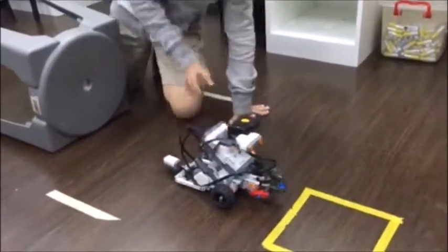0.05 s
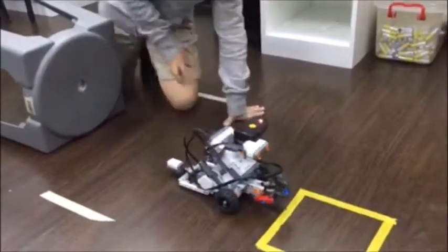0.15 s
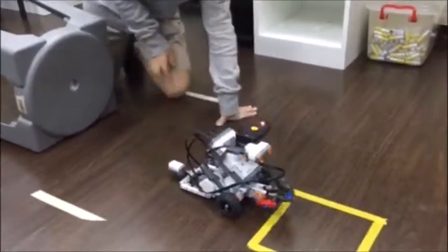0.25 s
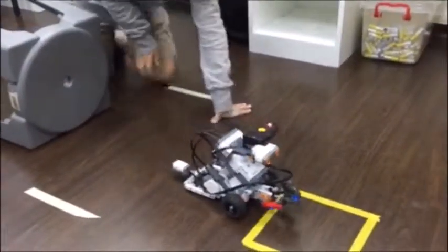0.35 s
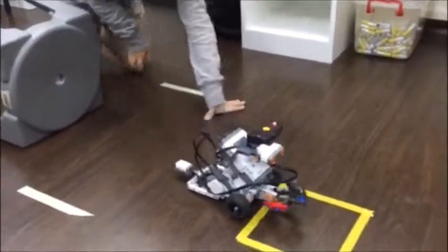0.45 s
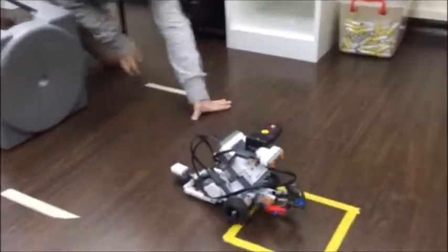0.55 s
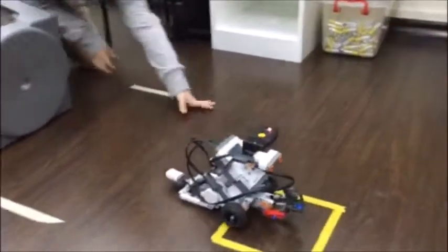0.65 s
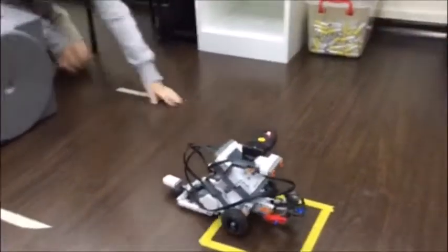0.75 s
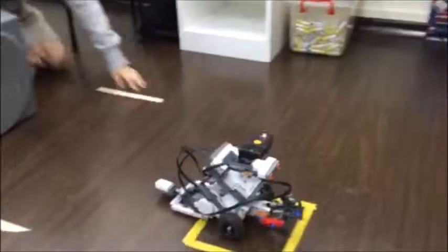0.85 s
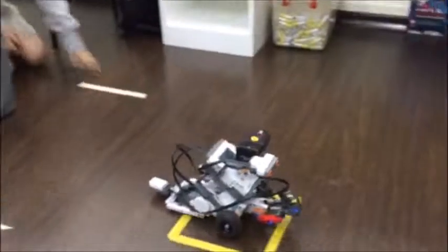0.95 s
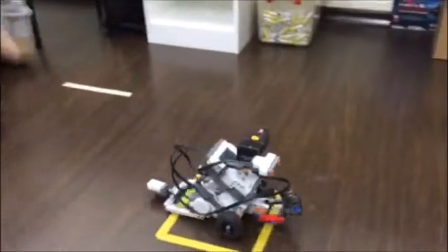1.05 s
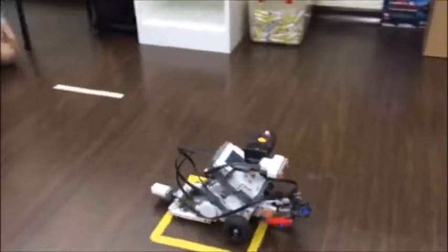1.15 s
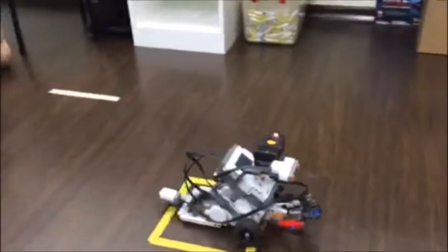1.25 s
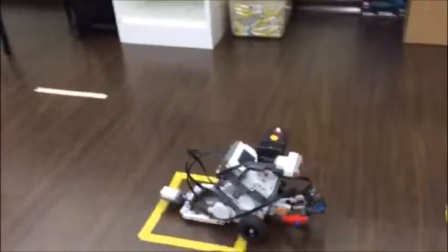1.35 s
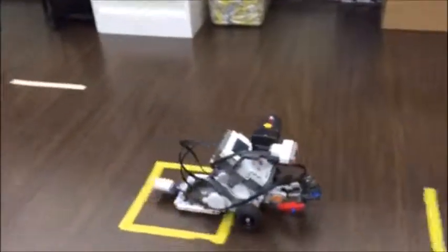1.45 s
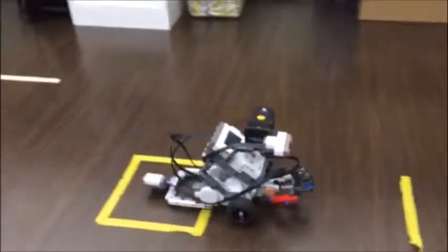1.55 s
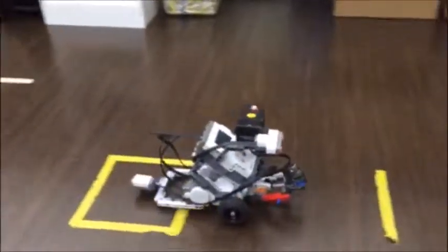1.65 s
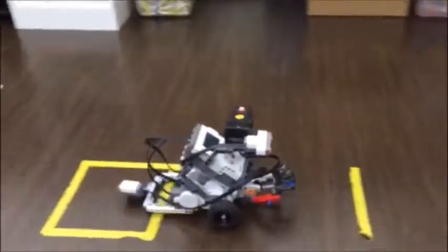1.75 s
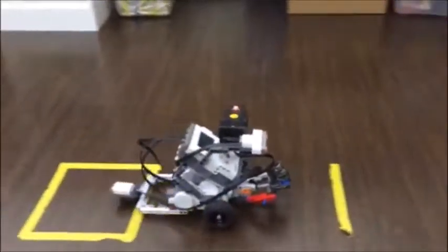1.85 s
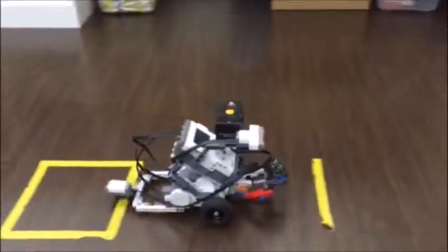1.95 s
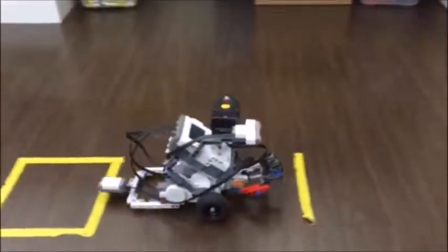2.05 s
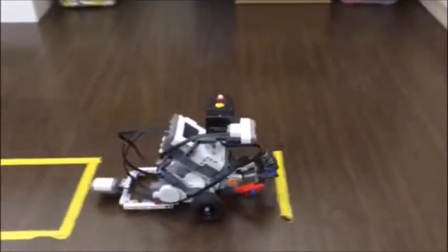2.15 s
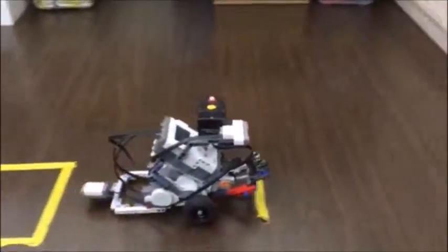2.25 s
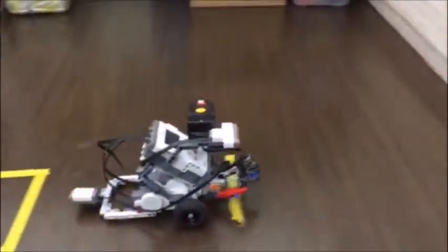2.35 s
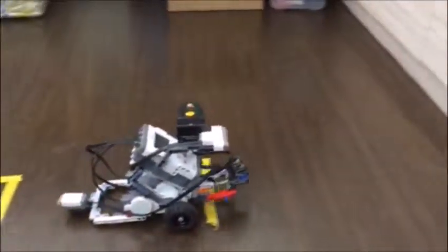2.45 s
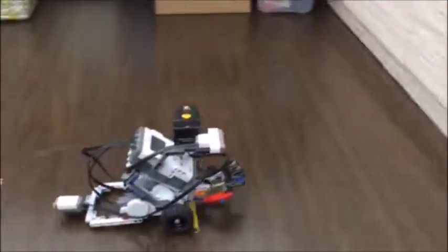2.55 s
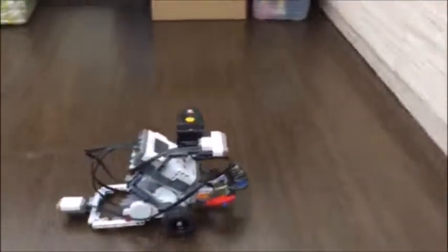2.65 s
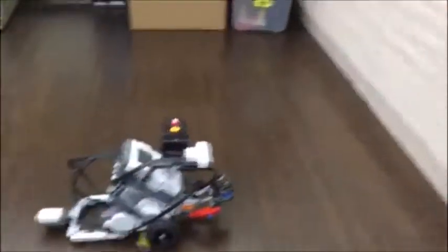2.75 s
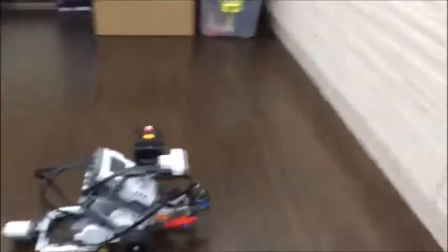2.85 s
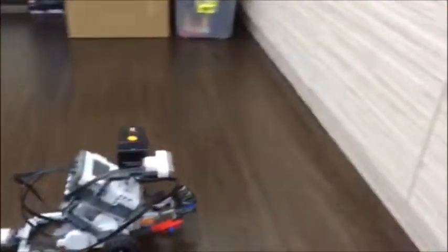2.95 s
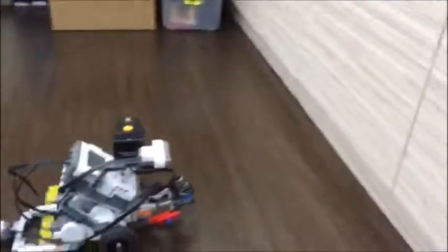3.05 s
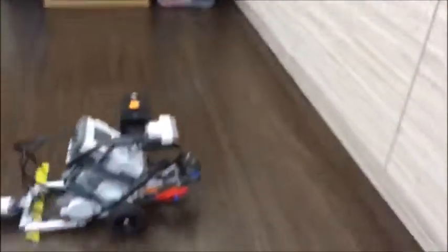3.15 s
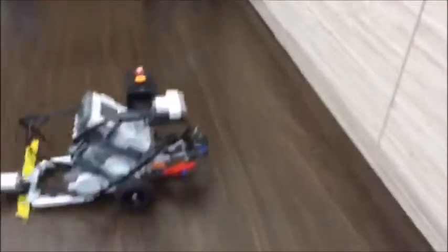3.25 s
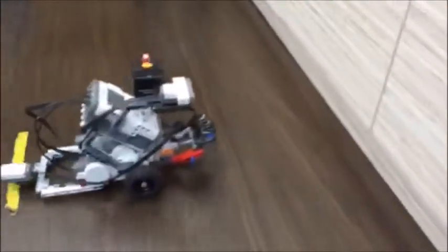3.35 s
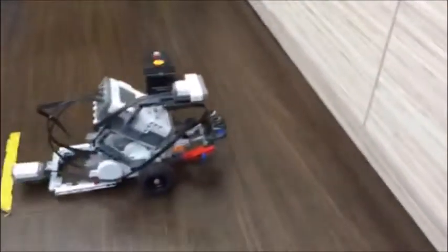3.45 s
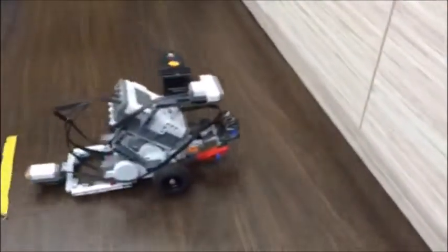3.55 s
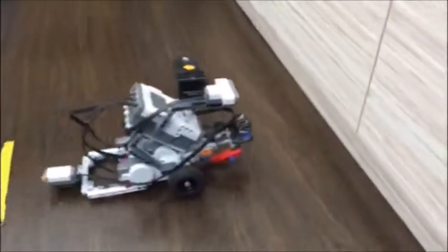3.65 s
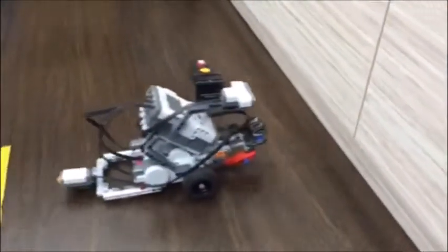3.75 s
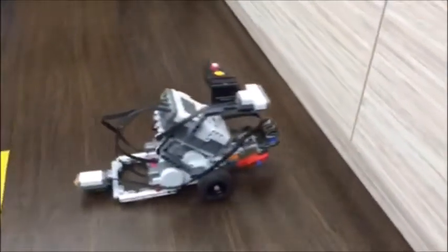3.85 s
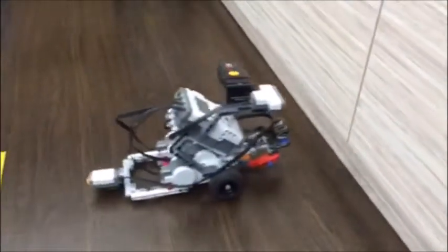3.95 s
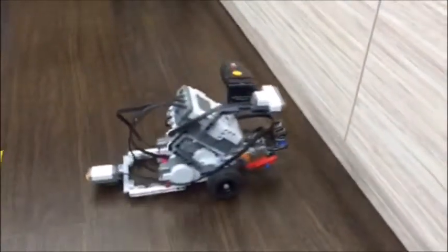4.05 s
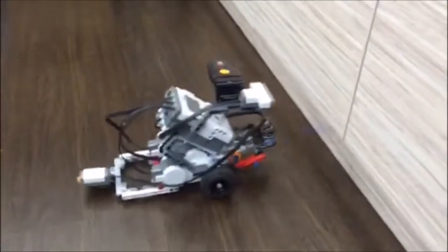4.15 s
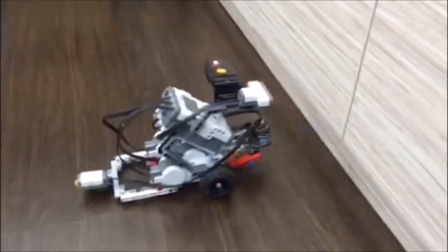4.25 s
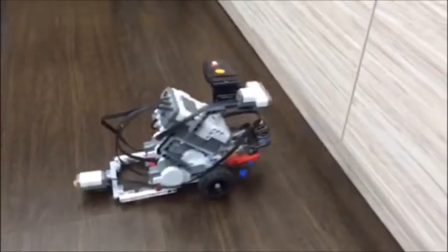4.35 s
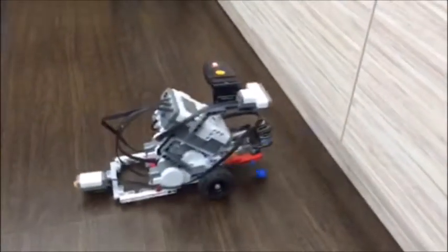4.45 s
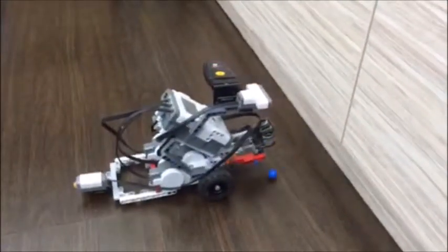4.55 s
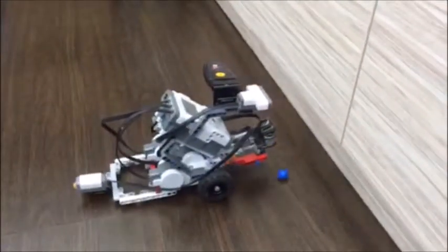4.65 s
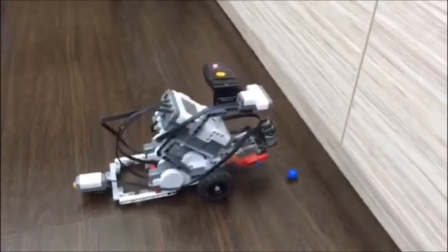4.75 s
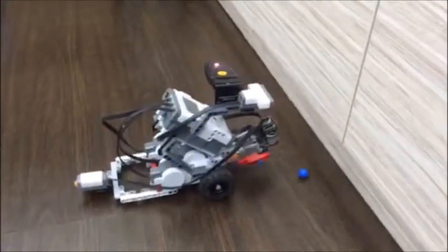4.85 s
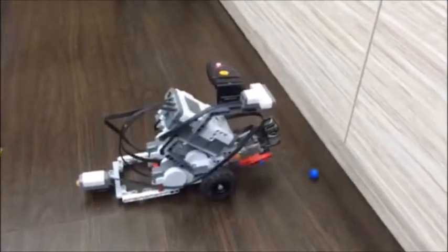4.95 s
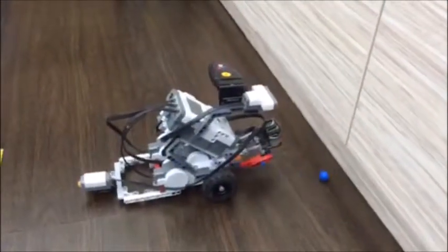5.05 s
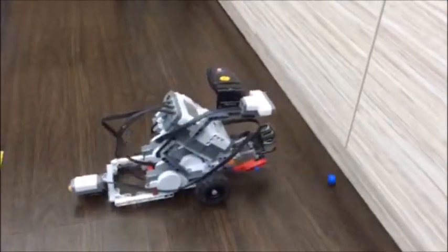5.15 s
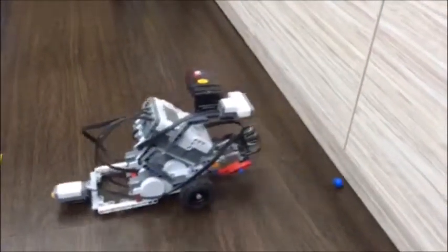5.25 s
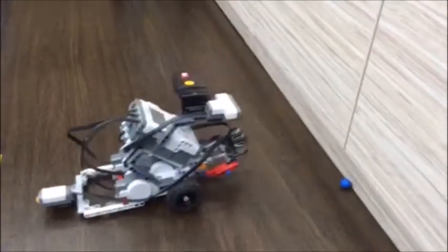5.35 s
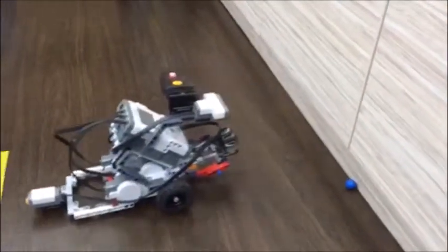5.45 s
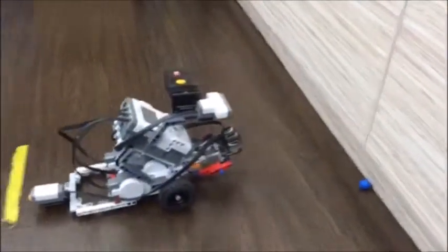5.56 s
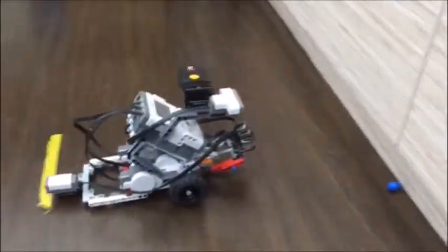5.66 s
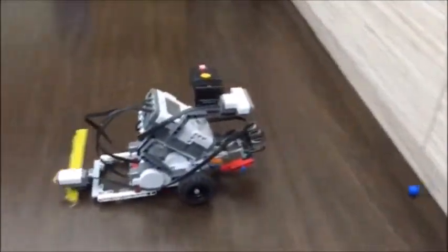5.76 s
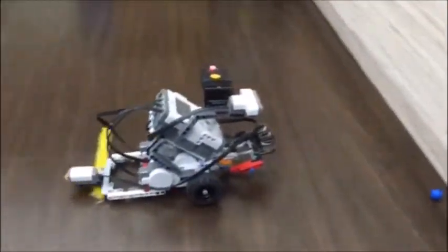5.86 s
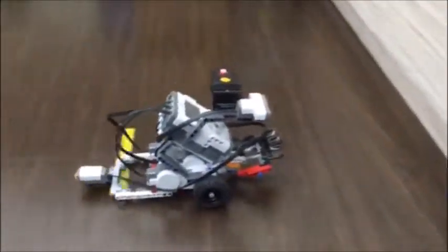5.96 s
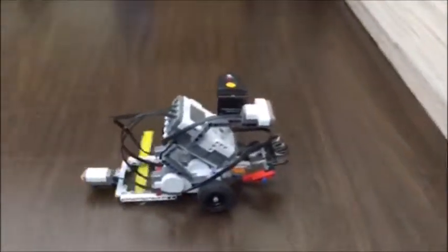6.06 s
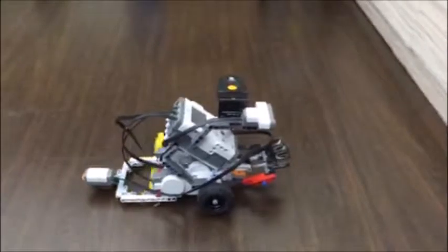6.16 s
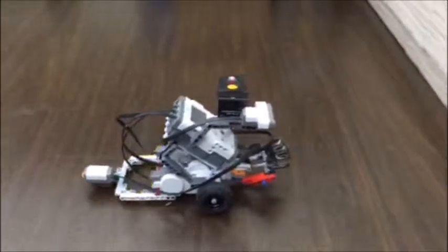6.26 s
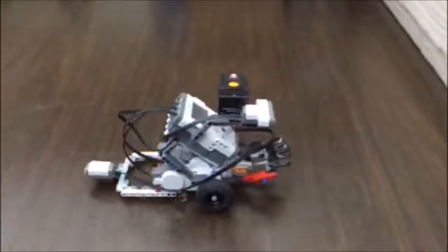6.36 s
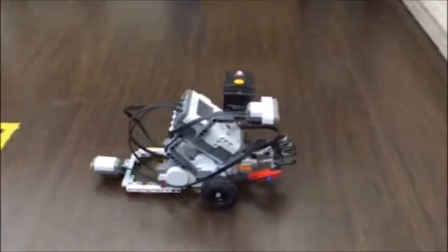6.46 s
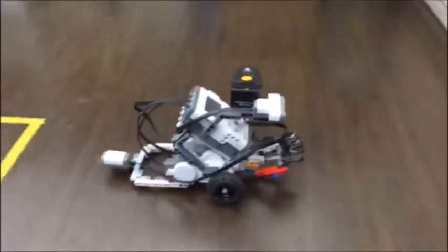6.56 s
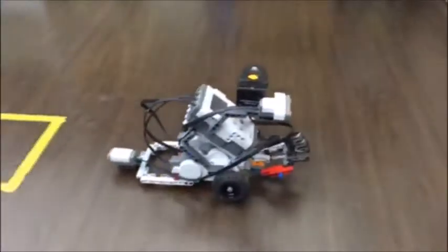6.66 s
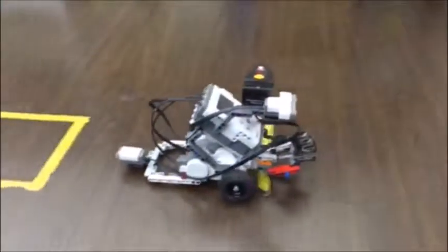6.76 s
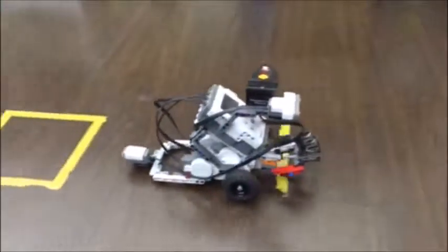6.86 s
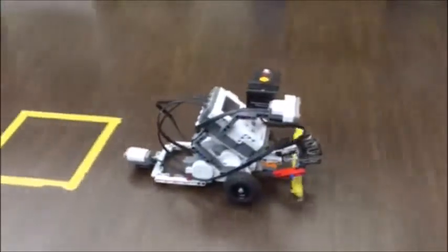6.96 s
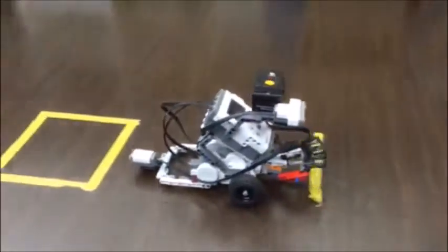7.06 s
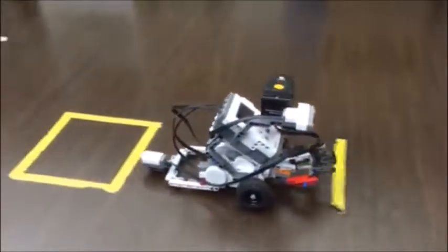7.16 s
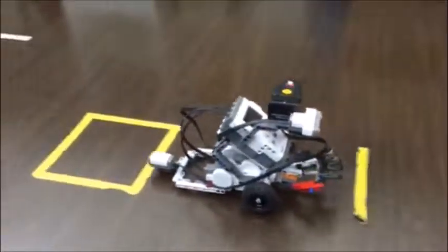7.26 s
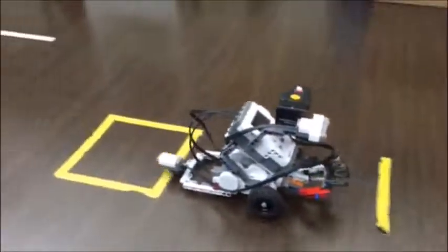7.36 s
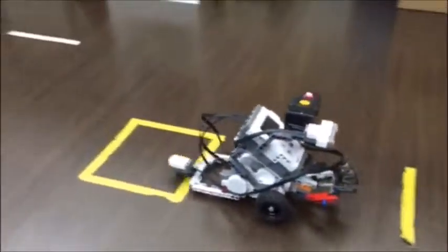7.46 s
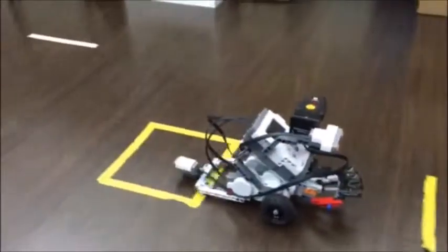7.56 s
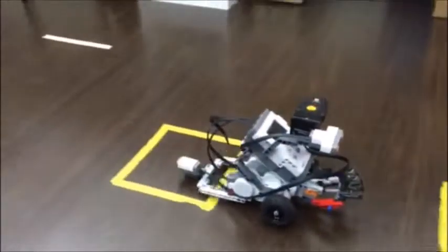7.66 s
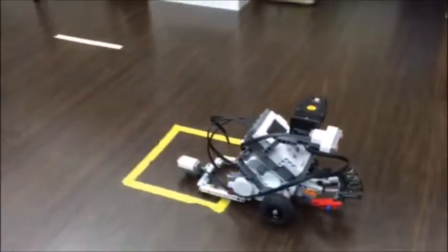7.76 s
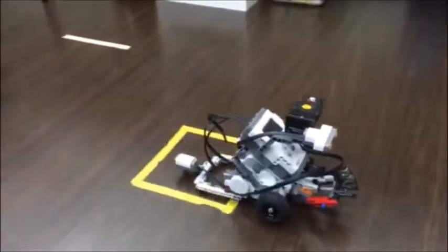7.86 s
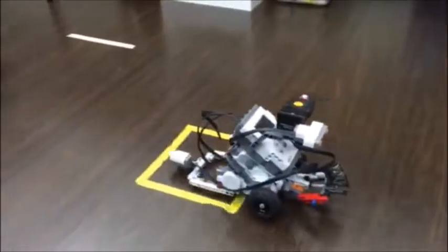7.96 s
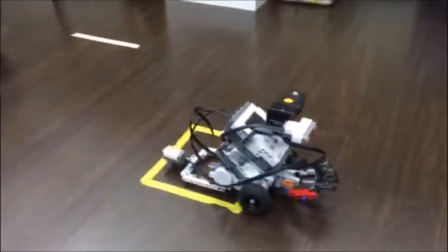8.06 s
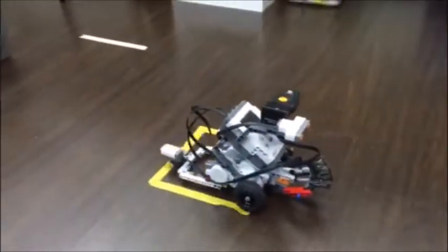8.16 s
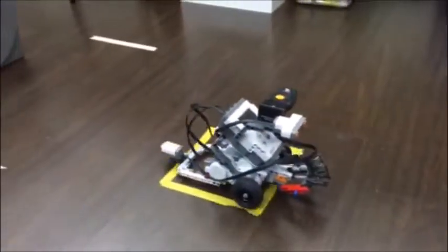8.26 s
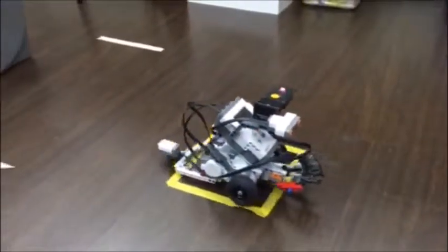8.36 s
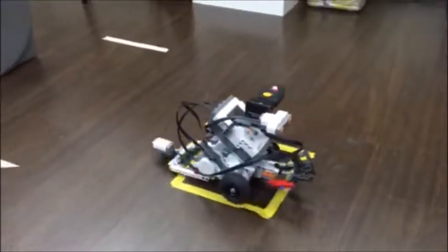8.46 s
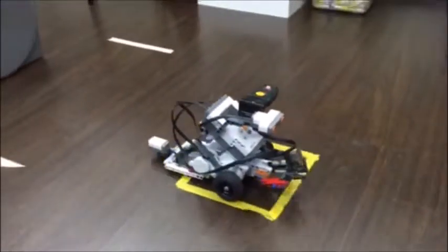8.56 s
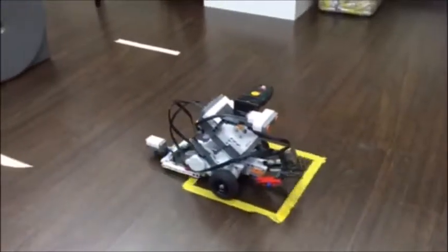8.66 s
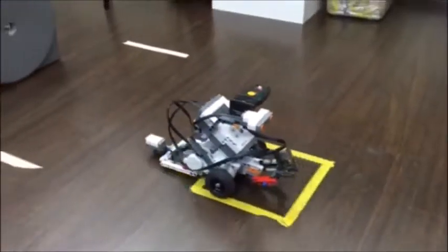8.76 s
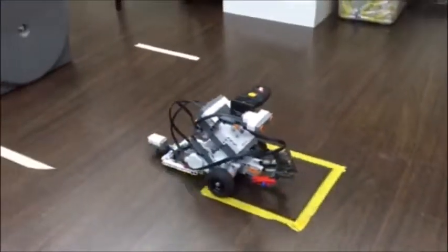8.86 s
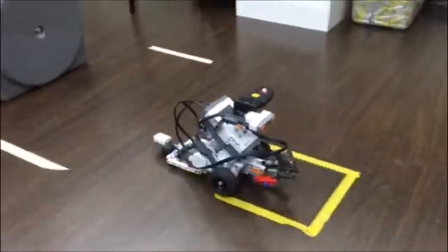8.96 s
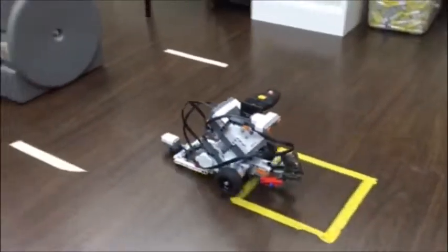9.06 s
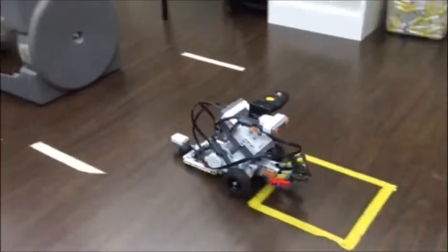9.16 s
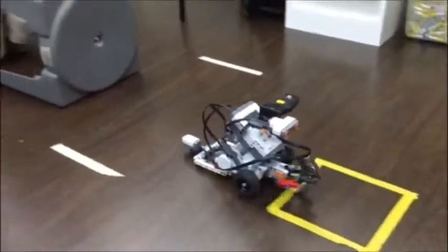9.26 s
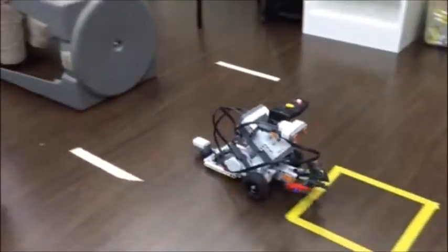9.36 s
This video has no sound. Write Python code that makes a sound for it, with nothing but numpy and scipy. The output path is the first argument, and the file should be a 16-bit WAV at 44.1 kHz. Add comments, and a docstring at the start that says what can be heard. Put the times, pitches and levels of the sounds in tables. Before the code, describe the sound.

In a hard, echoing room with low ventilation rumble, a toy robot's geared motors rattle and whine forward, pulsing slightly. Faint cloth shuffling, a knock and a short squeak come from the floor. After four seconds the motor drops to a lower whirr, a launcher snaps so loudly the microphone overloads, plastic bounces, a ball rolls off, and the robot reverses with a wavering whine.

```python
"""A hard room with a wooden floor and a low ventilation hum, heard through one microphone.
A toy robot drives over the boards, winds its launcher, snaps a ball out and backs away.
Its geared motors are sine tones and thousands of tiny hits, both following one turning shaft.
Clicks and knocks are dying bursts of noise; the rolling ball and a person shuffling are coloured noise.
The snap is so loud that the microphone overloads."""
import sys
import numpy as np
from scipy import signal
from scipy.io import wavfile
from scipy.ndimage import uniform_filter1d

SR = 44100
rng = np.random.default_rng(int(sys.argv[2]) if len(sys.argv) > 2 else 0)


def persist_wave(psi):
    """Save psi, clipped to +-1, as 16-bit WAV."""
    counts = np.round(np.clip(psi, -1, 1) * 32767).astype(np.int16)
    wavfile.write(sys.argv[1], SR, np.atleast_2d(counts).T)


def volts(x):
    """Linear amplitude factor 10**(x/20) for a level x in dB, scalar or array-like."""
    e = np.asarray(x, float) / 20
    return 10 ** e


N = 414540
T = np.arange(N) / SR

# ventilation rumble, shape of its spectrum: (frequency [Hz], relative level [dB per Hz])
AIR_COLOUR = [(12, -50), (30, -22), (50, -2.5), (75, -3.5), (97, 1.5), (120, -3), (157, -13), (202, -10),
              (243, -20), (308, -21), (409, -30.5), (553, -35), (688, -29.5), (761, -30.5), (962, -33),
              (1100, -26), (1800, -37), (4000, -41), (7000, -60)]
# ventilation hum: (frequency [Hz], middle level [dB])
HUM = [(98, -55), (197, -67)]
# clicks of gears taking up slack and of the launcher arm:
# (time [s], burst peak [dB], centre [Hz], time to fall 60 dB [s])
CLICKS = [(0.064, -36.5, 7000, 0.0087), (4.256, -22, 3030, .01), (4.2775, -20, 3100, .03),
          (4.281, 7.5, 2640, 0.009), (4.2855, -10, 1770, 0.018), (4.2987, -17, 5000, .01),
          (4.3378, -1.5, 4597, 0.0094), (4.3485, -36, 8900, .008), (4.362, -4.5, 3600, 0.012),
          (4.3775, -16, 10900, .006), (4.3833, -6, 4600, 0.0037), (4.396, -23, 9000, 0.0074),
          (5.301, -23, 2100, 0.014), (5.498, -22, 2400, .012)]
# ringing of the launcher arm: (frequency [Hz], relative level [dB], time to fall 60 dB [s])
ARM_MODES = [(970, -6, .03), (1630, -1, .04), (2700, -3, .025), (3700, -5, .025), (4200, -3, .03),
             (5000, -8, .025)]
# shudder of the frame: (frequency [Hz], relative level [dB per Hz])
SHUDDER_COLOUR = [(100, -16), (200, -13), (310, -24), (480, -13), (700, -16), (1000, 2.5), (1650, -3),
                  (2700, 0), (4200, -6.5), (6000, -3.5), (8000, -15), (15300, -46)]
# motor runs, the shaft carrying a ten-tooth gear: (time [s], mean tooth rate [Hz], rattle level [dB],
# top of the rattle against its rest [dB], whine against rattle [dB])
FORWARD_RUN = [(.066, 480.6, -48, -3, -30), (.14, 600, -37, -18, -28), (.23, 690.6, -33, -7, -14),
               (.36, 735.6, -30.5, -7.5, -12), (.7, 748.7, -32, -8, -6), (1.1, 744.5, -32, -6.5, -6.5),
               (1.5, 746, -32, -5.5, -6.5), (2.0, 751.6, -31.5, -5, -10), (2.4, 755, -32, -4, -8.5),
               (2.8, 753.8, -31.5, -5.5, -5.5), (3.2, 752.8, -31, -6.5, -8), (3.7, 756, -30.5, -5, -11),
               (4.04, 758.7, -31.5, -6, -8)]
LAUNCHER_RUN = [(4.045, 557, -33.5, -9, -14), (4.11, 626, -34, -0.5, -17), (4.18, 642, -31.5, -10, -13),
                (4.245, 635, -36.5, -11, -14), (4.279, 627, -32.5, -5, -16), (4.5, 626.6, -34, -5.5, -20),
                (4.7, 615.6, -38.5, -6, -26), (4.901, 601, -44.5, -17.5, -27),
                (5.075, 591, -51.5, -20, -20), (5.09, 593, -72, -23, -20), (5.15, 585, -77, -15, -20)]
BACKWARD_RUN = [(5.15, 401, -68, -18, -24), (5.18, 419.8, -43.5, -19, -8), (5.21, 460, -35, -13, -10),
                (5.3, 522.4, -32, -7, -8), (5.44, 642, -31, -10, -8.5), (5.5, 591.3, -30.5, -8.5, -10),
                (5.62, 666.5, -32, -9, -12), (5.7, 639, -31.5, -10.5, -14.5), (5.86, 638.6, -33, -10, -4),
                (6.06, 640.4, -30.5, -11, -6.5), (6.28, 631, -32.5, -9, -8.5), (6.6, 640, -32, -7.5, -6),
                (7.0, 644.4, -32.5, -7, -8), (7.5, 652.3, -33, -7, -6), (8.1, 652.2, -32.5, -8, -9.5),
                (8.7, 655, -33, -6.5, -10.5), (9.4, 652.3, -33.5, -7.5, -7.5)]
# an uneven wheel speeds and slows the motor: (one fastest moment [s], time per turn [s],
# swing once a turn [Hz], swing three times a turn [Hz], far wheel's motor against the near one [dB])
FORWARD_WHEEL = (2.305, .635, 30, -3, -18)
NO_WHEEL = (0, 1, 0, 0, -99)
BACKWARD_WHEEL = (7.503, .743, 41, -7, -12)
# strong tones at 2, 3, 4, 5 times the tooth rate: (level against the whine [dB], rise when fastest [dB])
FORWARD_WHINE = [(-0.9, -1), (-13.5, 0.1), (-8, 0.5), (-10, -1.5)]
LAUNCHER_WHINE = [(-9, 0), (0, 0), (-5, 0), (-7, 0)]
BACKWARD_WHINE = [(-5.5, 0.1), (-1, 1.3), (-8, 3.5), (-12.5, -3)]
# weaker tones, the tenths from uneven teeth: (multiple of the tooth rate [-], level against rattle [dB])
FORWARD_ORDERS = [(1.0, -34), (1.3, -39), (1.5, -37), (1.6, -33), (1.7, -29), (1.9, -27), (2.1, -25),
                  (2.3, -21), (2.5, -24), (2.7, -22), (3.1, -23), (4.9, -21), (5.7, -24), (5.8, -23),
                  (6.0, -19), (6.2, -23), (6.3, -22), (7.0, -30), (9.3, -28), (9.4, -27)]
LAUNCHER_ORDERS = [(2.701, -30), (3.299, -26), (6, -20), (6.201, -28), (8, -27), (8.701, -27)]
BACKWARD_ORDERS = [(1.0, -44.5), (1.298, -47), (1.4, -53), (1.699, -47), (1.8, -46), (1.9, -32.5),
                   (2.1, -30), (2.3, -30), (2.501, -23.5), (2.7, -41), (2.799, -24), (2.9, -34), (3.1, -26),
                   (3.2, -26.5), (3.301, -34), (4.1, -14.5), (4.2, -19.5), (4.6, -16), (4.7, -20.5),
                   (4.899, -42), (5.3, -42), (5.5, -53), (8.3, -29), (8.399, -43)]
# the rattle throbs with the shafts: (multiple of the tooth rate [-], depth [dB])
THROBS = [(.031, 0.6), (.1, -1.35), (.2, -0.3), (.3, 0.5)]
# sound given off by the plastic frame: (frequency [Hz], relative level [dB per Hz])
FORWARD_FRAME = [(600, -33), (1090, -21.5), (1500, -7), (1870, -6), (3400, -10), (4550, -7.5), (5400, -10),
                 (7000, -11), (8500, -9.5), (10300, -15), (11200, -15.5), (12800, -12), (14200, -16.5),
                 (15300, -16)]
LAUNCHER_FRAME = [(240, -39), (400, -19), (586, -25), (662, -26), (1220, -6.5), (1510, -2.5), (1650, 3.5),
                  (3300, -2.5), (3750, 6), (4250, -0.5), (5260, -1), (8070, -11), (10600, -18),
                  (13300, -13.5), (15300, -21)]
BACKWARD_FRAME = [(900, -32), (1100, -28), (1250, -11), (1630, -7.5), (1980, 1.5), (2300, -7.5), (2750, -4),
                  (4360, -5), (4960, -12), (5700, -7.5), (7600, -14), (9900, -6), (13900, -17),
                  (15300, -20.5)]
# echoes dying away: (frequency [Hz], time to fall 60 dB [s])
ROOM_DECAY = [(250, 0.2), (1000, 0.51), (4000, 0.67), (12000, 0.48)]
# cloth sliding on boards: (time [s], length [s], level [dB])
SHUFFLE = [(0.256, 0.31, -53.5), (0.524, 0.23, -56), (.78, 0.44, -55), (1.265, .1, -42.5), (1.3, 0.95, -58)]
# colour of that sliding: (frequency [Hz], relative level [dB per Hz])
SHUFFLE_COLOUR = [(120, -25), (260, 6), (450, -9), (700, -1), (1100, -31.5)]
# ball, wheels, knees and feet on boards: (time [s], burst peak [dB], centre [Hz], time to fall 60 dB [s])
KNOCKS = [(.53, -39.5, 596, 0.4), (.826, -43, 260, 0.13), (1.274, -30, 740.5, 0.18), (1.3, -35.5, 300, .2),
          (1.718, -41, 250.2, 0.099), (2.45, -41.5, 180.4, 0.08), (4.049, -41, 299.6, 0.082),
          (4.282, -11, 519.7, .05), (4.283, -16, 190, 0.036), (4.338, -14, 500, .03),
          (4.364, -27, 600, 0.045), (4.384, -24.5, 696, .04), (4.459, -41, 480, .05),
          (4.487, -35.5, 551, .05), (5.297, -30, 900, .05), (5.497, -27, 830, 0.098)]
# skin or sole dragged on varnish: (time [s], pitch [Hz], middle level [dB])
SQUEAK = [(.82, 220.8, -59), (.87, 313.2, -45), (.98, 317, -47), (1.02, 339, -56), (1.1, 347, -58)]
# the ball rolling away over the boards: (time [s], level [dB])
ROLL = [(4.42, -46), (4.84, -48.5), (5.0, -54.5), (5.3, -59), (5.6, -63)]
# colour of the rolling: (frequency [Hz], relative level [dB per Hz])
ROLL_COLOUR = [(150, -30), (300, 1.5), (600, 6.5), (1000, -2), (1800, -29)]
# the level dips briefly: (time [s], depth [dB], length [s])
DIPS = [(0.246, -4, .015), (.905, -5, .015), (1.675, -4, .015), (2.016, -9, .03), (3.885, -4, .015),
        (4.04, -5, .02), (4.425, -6, .017), (6.983, -5, .015), (7.839, -5, .015), (7.987, -4, .015),
        (8.715, -6, .015), (8.81, -4, .015), (9.225, -4, .015), (9.385, -6, .015)]


def evened(x):
    """Scales a sound to an rms of 1."""
    return x / np.sqrt(np.mean(x ** 2) + 1e-20)


def read(points, hz):
    """Reads a curve between its points on a log-frequency axis."""
    f, value = np.transpose(points)
    return np.interp(np.log(hz + 1), np.log(f + 1), value)


def columns(rows):
    """Draws each column over time; gives the times, a gate with 2 ms soft ends, then the columns."""
    s, *values = np.transpose(rows)
    t = np.arange(s[0], s[-1], 1 / SR)
    gate = np.clip(np.minimum(t - s[0], s[-1] - t) / .002, 0, 1)
    return t, gate, *(np.interp(t, s, v) for v in values)


def coloured(x, points):
    """Filters a sound to the given spectrum without sounding ahead of it (minimum phase)."""
    hz = abs(np.fft.fftfreq(8192, 1 / SR))
    log_gain = np.log(volts(np.maximum(read(points, hz), -100)))
    taps = np.fft.ifft(np.exp(np.conj(signal.hilbert(log_gain)))).real[:4096]
    return signal.oaconvolve(x, taps)[:len(x)]


def wander(hz, t):
    """Slow random drift of rms about 1, with hz new targets a second."""
    targets = rng.standard_normal(4000)
    return np.interp((t - t[0]) * hz, np.arange(4000), targets) * np.sqrt(3 / 2)


def resonate(x, hz, width):
    """A resonance at one pitch; a greater width in Hz dies faster."""
    r = np.exp(-np.pi * width / SR)
    turn = 2 * np.pi * min(hz, 16000) / SR
    return signal.lfilter([1, 0, -1], [1, -2 * r * np.cos(turn), r * r], x)


def add(mix, s, sound):
    """Mixes a sound in at time s."""
    part = mix[round(s * SR):][:len(sound)]
    part += sound[:len(part)]


def tones(t, turns, lines, flutter_db, flutter_hz):
    """Sine tones at multiples of one turning angle, each swelling and fading at random."""
    total = 0
    for multiple, db in lines:
        loudness = volts(db + flutter_db * wander(flutter_hz, t))
        total = total + loudness * np.sin(multiple * turns + 2 * np.pi * rng.random())
    return np.sqrt(2) * total


def air():
    """Ventilation: lumpy low noise, a hum of wavering pitch and loudness, and faint hiss."""
    rumble = coloured(rng.standard_normal(N + 4096), AIR_COLOUR)[4096:]  # skip the filter's start
    rumble = rumble * volts(1.1 * wander(7.7, T))
    turns = 2 * np.pi * np.cumsum(1 + 0.01504 * wander(6, T)) / SR  # 1 Hz, so multiples are in Hz
    hiss = volts(-74) * rng.standard_normal(N)
    return volts(-46) * evened(rumble) + tones(T, turns, HUM, 2.8, 7.6) + hiss


def blows(rows, sharpness, modes=(), ring_db=-6):
    """Each blow is a dying noise burst around its centre pitch, and rings the given modes."""
    out, t = np.zeros(N), np.arange(12000) / SR
    for s, db, hz, t60 in rows:
        burst = resonate(rng.standard_normal(len(t)), hz, hz / sharpness)
        burst = resonate(burst, hz, 2.34 * hz) * volts(-60 * t / max(t60, .002))
        burst *= np.minimum(t * hz / 0.23, 1)  # soft start
        burst /= np.sqrt(uniform_filter1d(burst ** 2, 2 + int(SR / hz)).max() * 2)
        for f, mode_db, ring in modes:
            distance_db = -2.8 * abs(np.log2(f / hz))  # modes far from the blow's pitch ring less
            level = volts(ring_db + mode_db + distance_db - 60 * t / ring)
            burst += level * np.sin(2 * np.pi * (f * t + rng.random()))
        add(out, s, volts(db) * burst)
    return out


def launcher():
    """Gears click; the arm lets go, slaps its stop and bounces, and the frame shudders after each click."""
    shudder_db, shudder_t60 = -17.5, 0.2  # against the click's peak [dB]; time to fall 60 dB [s]
    power = 0
    for s, db, _, _ in CLICKS:
        power = power + (T > s) * volts(db + shudder_db - 60 * abs(T - s) / shudder_t60) ** 2
    grit = rng.standard_normal(N) * volts(2.6 * wander(400, T))
    shudder = np.sqrt(power) * evened(coloured(grit, SHUDDER_COLOUR))
    return blows(CLICKS, 1.0, ARM_MODES, ring_db=-10) + shudder


def worn_teeth(turns, likeness):
    """Tooth roughness that comes back, slowly changing, with every turn of the ten-tooth shaft."""
    shaft = turns / (2 * np.pi * 10)
    like = np.clip(likeness, 0, .95)
    fresh = rng.standard_normal((400, 640))  # shaft turns x places around the shaft
    flanks = signal.lfilter([np.sqrt(1 - like ** 2)], [1, -like], fresh, axis=0)
    return flanks[shaft.astype(int), (shaft % 1 * 640).astype(int)]


def rattle(t, turns, frame, top_db, spread_db, tooth_db, hits_per_s=5000, worn=0.87):
    """Loose gears hit the frame thousands of times a second, their force throbbing as the teeth meet."""
    size = volts(spread_db * np.minimum(rng.exponential(1, len(t)), 5))
    size = size * rng.choice([-1., 1.], len(t))
    hits = evened(size * (rng.random(len(t)) < hits_per_s / SR))
    hits = hits + worn * worn_teeth(turns, 0.822)
    force_db = tooth_db * np.sin(turns)
    for multiple, db in THROBS:
        force_db = force_db + db * np.sin(multiple * turns + 2 * np.pi * rng.random())
    force_db = force_db + .5 * wander(8.3, t) + 0.45 * wander(120, t)
    body = coloured(hits * volts(force_db), frame)
    low = signal.oaconvolve(body, signal.firwin(21, 7500, fs=SR), "same")
    high = signal.oaconvolve(body, signal.firwin(101, 1800, pass_zero=False, fs=SR), "same")
    top = evened(body - low) * volts(top_db)
    return top + low / np.std(high)  # level set by the part above 1800 Hz


def motor(mix, run, wheel, main, orders, frame, spread_db, tooth_db, jitter=.005):
    """One run of a geared motor: whine and rattle follow the same shaft."""
    frame_share = .7  # how far a gliding tone follows the colour of the frame
    waver_db, waver_hz = 2.2, 9  # slow fading of the strong tones
    t, gate, hz, level_db, top_db, whine_db = columns(run)
    fastest, period, once, thrice, far_db = wheel
    angle = 2 * np.pi * (t - fastest) / period
    tone = 0
    # far motor, then near: (level [dB], share of the wheel's wobble, lag [radians])
    for db, share, lag in [(far_db, .4, 2.5), (0, 1, 0)]:
        wobble = once * np.cos(angle - lag) + thrice * np.cos(3 * (angle - lag))
        speed = hz + share * wobble
        turns = 2 * np.pi * np.cumsum(speed * (1 + jitter * wander(50, t))) / SR
        strong = []
        for k, (line_db, swing) in enumerate(main, 2):
            frame_db = frame_share * (read(frame, k * speed) - read(frame, k * np.median(speed)))
            strong_db = whine_db + db + line_db + frame_db + swing * np.cos(angle)
            strong.append((k, strong_db + waver_db * wander(waver_hz, t)))
        tone = tone + tones(t, turns, strong, 2.0, 45)
    # the near motor's turns also carry the weak tones and the rattle
    fade_in = np.clip((t - t[0]) / 0.19, 0, 1) ** 2
    tone += fade_in * tones(t, turns, orders, 3.76, 21.95)
    gears = rattle(t, turns, frame, top_db, spread_db, tooth_db)
    add(mix, t[0], gate * volts(level_db) * (tone + gears))


def motors():
    """Drive motors forward and back, the launcher motor between."""
    mix = np.zeros(N)
    motor(mix, FORWARD_RUN, FORWARD_WHEEL, FORWARD_WHINE, FORWARD_ORDERS, FORWARD_FRAME,
          spread_db=1.1, tooth_db=1.1)
    motor(mix, LAUNCHER_RUN, NO_WHEEL, LAUNCHER_WHINE, LAUNCHER_ORDERS, LAUNCHER_FRAME,
          spread_db=2.7, tooth_db=2.5)
    motor(mix, BACKWARD_RUN, BACKWARD_WHEEL, BACKWARD_WHINE, BACKWARD_ORDERS, BACKWARD_FRAME,
          spread_db=1.25, tooth_db=1.9)
    return mix


def shifting(x, patchy_db=1.4):
    """Echoes off floor and furniture shift as the robot moves: patches of the spectrum swell and sink."""
    z = signal.stft(x, nperseg=512, noverlap=384)[2]
    patches = rng.standard_normal(z.shape[::-1]).T
    patches = uniform_filter1d(patches, size=3, axis=0)  # smooth over pitch
    patches = evened(uniform_filter1d(patches, size=24, axis=1))  # smooth over time
    return signal.istft(z * volts(patchy_db * patches), nperseg=512, noverlap=384)[1][:N]


def room(x):
    """Echoes: sparse taps of random sign, each band dying at its own speed."""
    taps = np.zeros(SR)
    count = (SR - 201) // 20
    places = np.arange(200, SR - 20, 20) + rng.integers(0, 20, count)
    taps[places] = rng.choice([-1., 1.], count)
    hz, t, z = signal.stft(taps, SR, nperseg=256)
    decay = volts(-60 * t / read(ROOM_DECAY, hz)[:, None])
    tail = signal.istft(z * decay, SR, nperseg=256)[1]
    return signal.oaconvolve(x, tail / np.linalg.norm(tail))[:N]


def shuffling():
    """Cloth slides on the boards: uneven noise that swells and fades with each stroke."""
    strokes = 0
    for s, length, db in SHUFFLE:
        progress = np.clip((T - s) / length, 0, 1)
        strokes = strokes + volts(db) * np.sin(np.pi * progress ** 0.65)
    drag = rng.standard_normal(N) * volts(1.4 * wander(60, T))
    return strokes * evened(coloured(drag, SHUFFLE_COLOUR))


def squeak(mix):
    """Skin or sole drags on varnish: one gliding sine of unsteady loudness."""
    t, gate, hz, db = columns(SQUEAK)
    glide = np.sqrt(2) * np.sin(2 * np.pi * np.cumsum(hz) / SR)
    add(mix, t[0], gate * volts(db + 1.68 * wander(50, t)) * glide)


def rolling_ball(mix):
    """The ball rolls away over the boards: gritty noise that dies down."""
    t, gate, db = columns(ROLL)
    grit = rng.standard_normal(len(t)) * volts(1.8 * wander(88.8, t) + 1.53 * wander(12, t))
    add(mix, t[0], gate * volts(db) * evened(coloured(grit, ROLL_COLOUR)))


def boards():
    """All that touches the floor: shuffling, knocks, one squeak and the rolling ball."""
    mix = shuffling() + blows(KNOCKS, 2.3)
    squeak(mix)
    rolling_ball(mix)
    return mix


def scene():
    """Robot, blows, their echoes and the air reach one microphone."""
    robot = shifting(motors())
    hits = launcher() + boards()
    mix = robot + hits + room(volts(-9) * (robot + hits)) + air()
    return np.array([mix, mix])


def band_limit(x):
    """A steep low-pass at the top of the band."""
    return signal.sosfilt(signal.butter(12, 15460, fs=SR, output="sos"), x)


def record(dry):
    """The level dips briefly, the treble ends near 15.4 kHz, and overload flattens the loudest peaks."""
    dip_db = 0
    for s, db, length in DIPS:
        dip_db = dip_db + db * np.exp(-.5 * ((T - s) / (length / 3.0)) ** 2)
    treble_limit = signal.firwin(511, 15400, window=("kaiser", 9), fs=SR)
    heard = signal.oaconvolve(dry * volts(dip_db), treble_limit[None], "same")
    overloaded = np.clip(heard, -1, 1)
    return band_limit(overloaded)


dry = scene()
out = record(dry)
persist_wave(out)
```